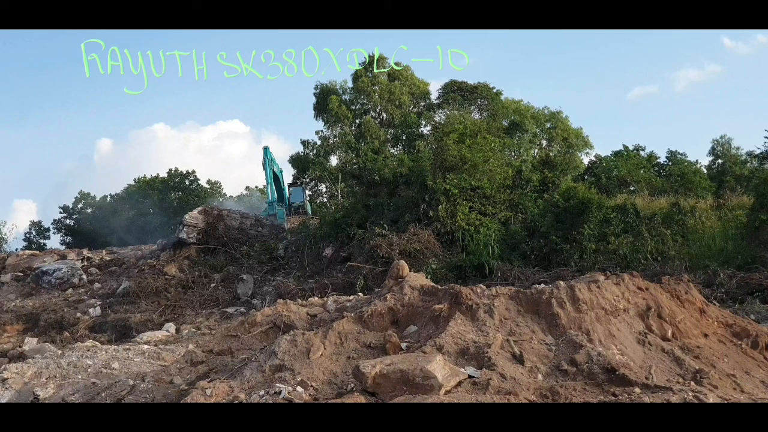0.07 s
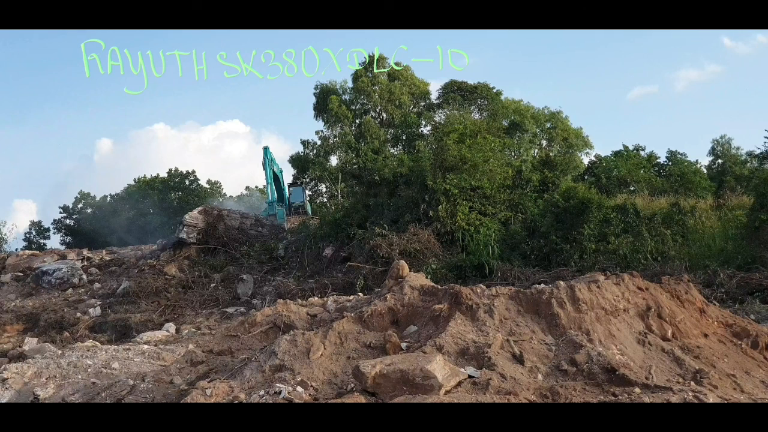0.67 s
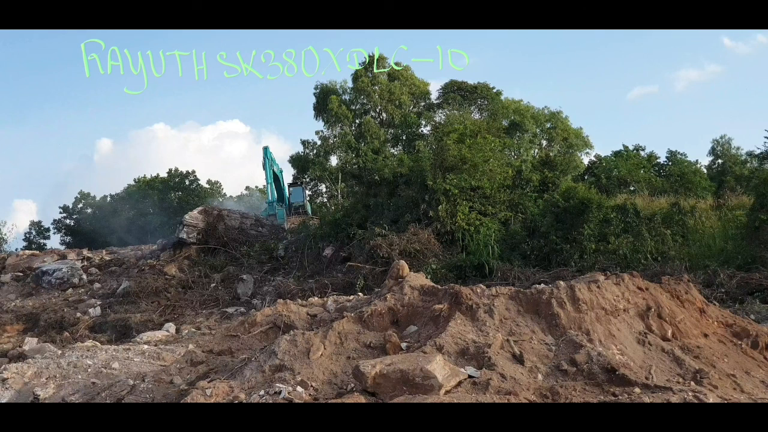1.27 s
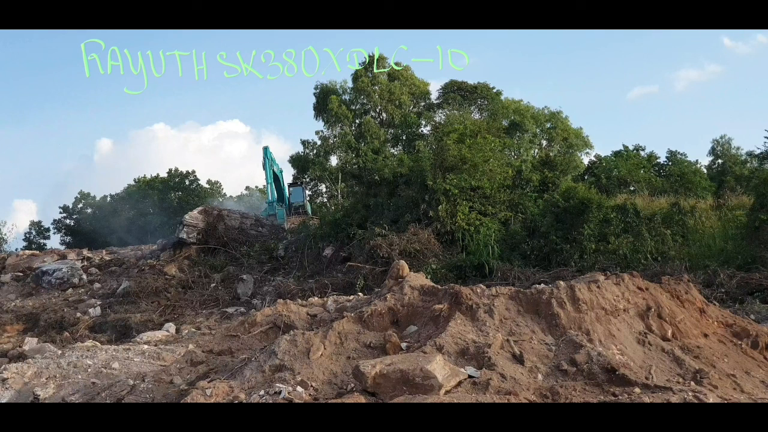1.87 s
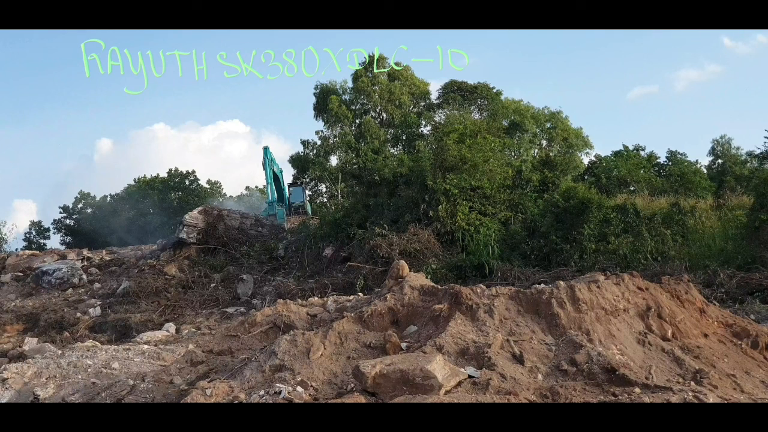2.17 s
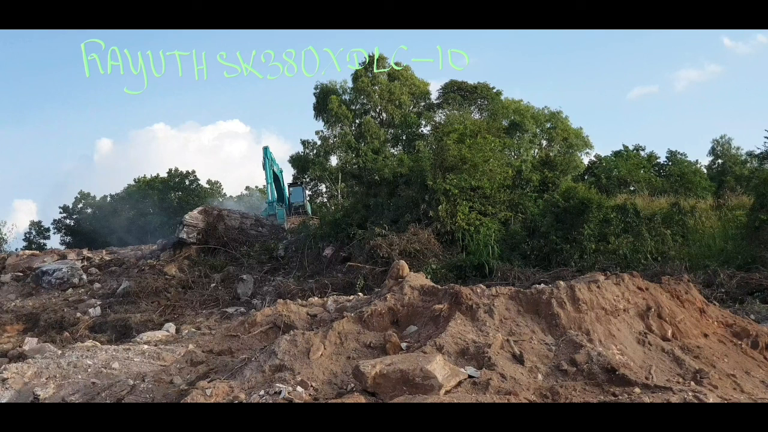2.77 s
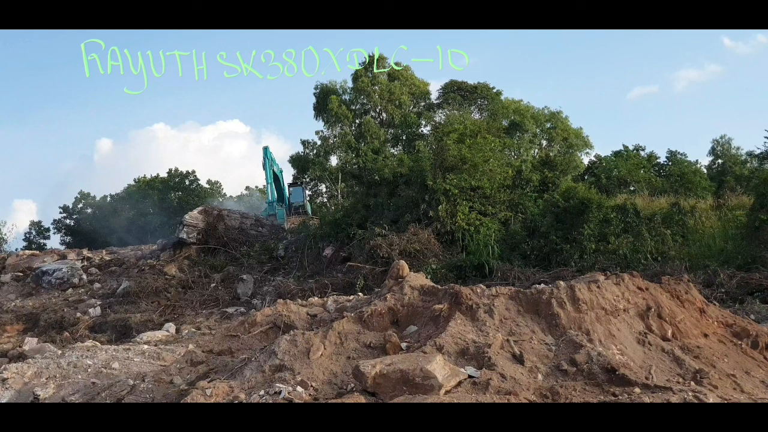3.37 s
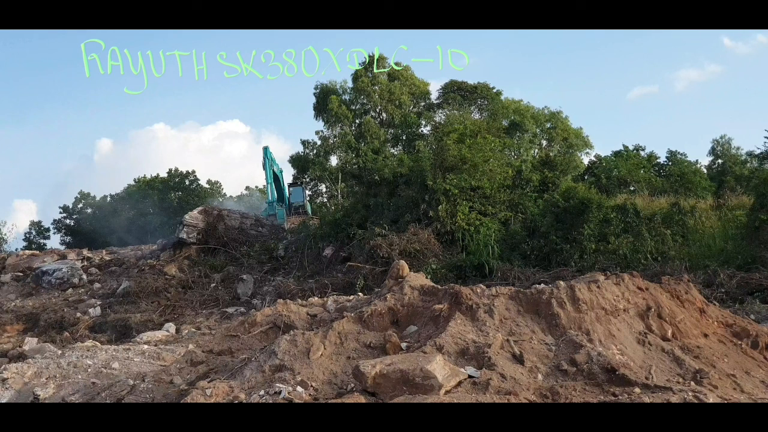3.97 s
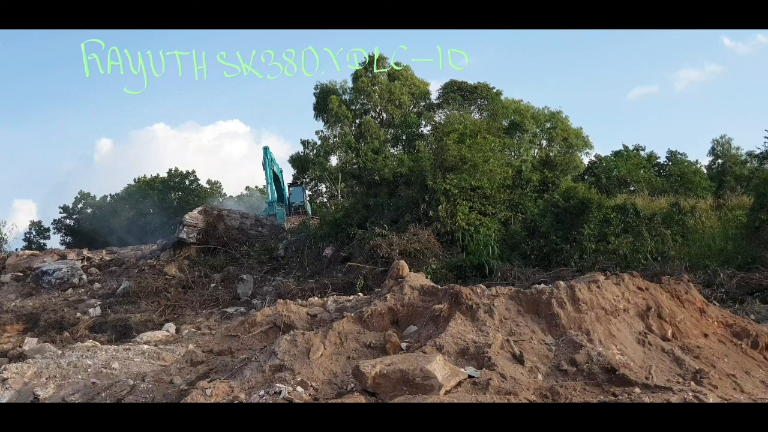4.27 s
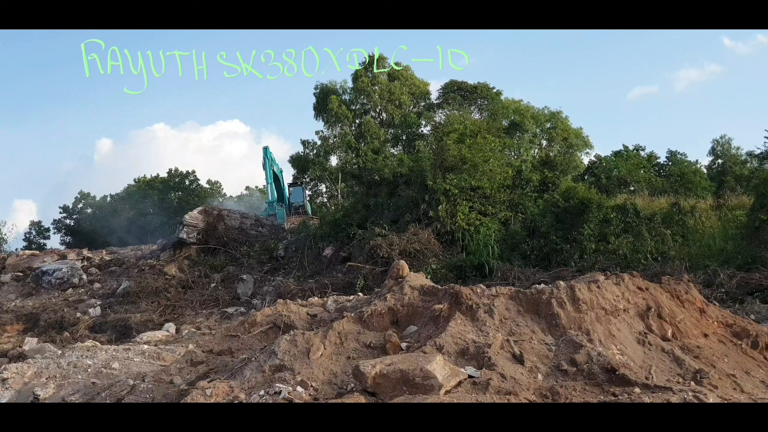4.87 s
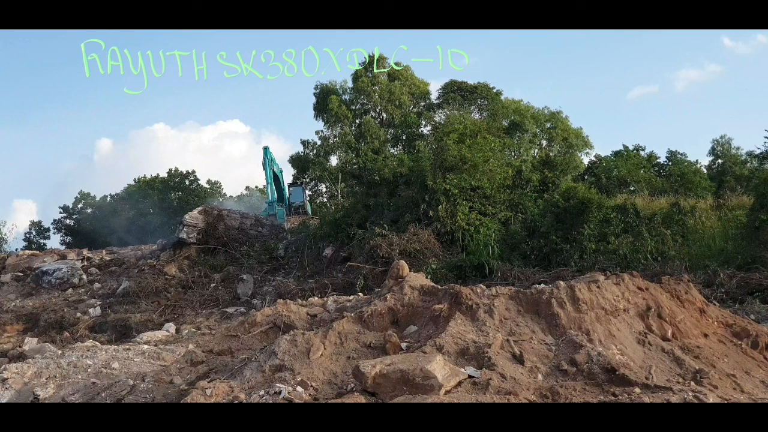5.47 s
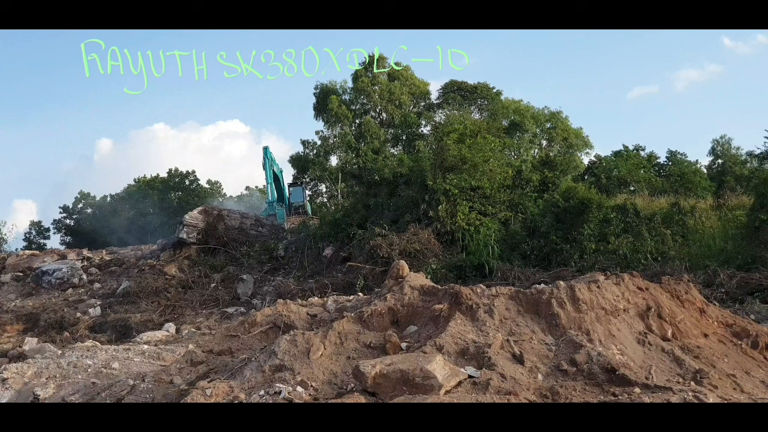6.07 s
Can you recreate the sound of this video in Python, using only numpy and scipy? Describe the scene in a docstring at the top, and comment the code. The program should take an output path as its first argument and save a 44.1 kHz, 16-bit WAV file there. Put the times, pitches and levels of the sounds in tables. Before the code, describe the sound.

Outdoors at a dirt site, a distant excavator gives a constant low diesel rumble and hum, with faint ticks and pings of loose metal over a soft leafy hiss. Two small crunches of soil and stone come near the microphone first. Later, rocks knock and ring briefly on thick steel, twice, dulled by distance, as the engine runs on unchanged.

```python
"""A distant excavator chugs at idle on rocky earthworks, a second diesel and a cooling fan droning beside it.
Periodic firing gives the exhaust its harmonics and pings the block, while loose metal rattles.
Grit crunches faintly close by, over a soft hiss of trees and open air that swells with one gust.
Twice, tumbling rocks excite the modes of a heavy steel plate, dulled by distance and scattered by mounds."""
import sys
import numpy as np
from scipy import signal
from scipy.fft import rfft, irfft
from scipy.io import wavfile
from scipy.ndimage import uniform_filter1d

SR = 44100
rng = np.random.default_rng(int(sys.argv[2]) if len(sys.argv) > 2 else 0)


def generate_wav(sig):
    """Save sig (samples, or channels by samples) to the path in sys.argv[1] as 16-bit PCM at SR."""
    pcm = np.round(np.clip(np.atleast_2d(sig).T, -1, 1) * 32767).astype(np.int16)
    wavfile.write(sys.argv[1], SR, pcm)


N = 269451
TIME = np.arange(N) / SR


def amp(db):
    """Amplitude grows tenfold with every 20 dB."""
    return 10 ** (np.asarray(db) / 20)


def unit(x):
    """Normalisation to an rms of 1."""
    return x / np.sqrt(np.mean(x ** 2) + 1e-20)


def damping(t, t60):
    """A free vibration decays exponentially, by 60 dB in t60 seconds."""
    return np.exp(-np.log(1000) * t / t60)


def curve_at(points, hz):
    """Interpolation along a logarithmic frequency axis."""
    f, value = np.transpose(points)
    return np.interp(np.log(hz + 1), np.log(f + 1), value)


def add(mix, start_s, sound):
    """Superposition: a stereo sound joins the mix at its start time."""
    part = mix[:, max(round(start_s * SR), 0):][:, :sound.shape[1]]
    part += sound[:, :part.shape[1]]


def drift(top_hz):
    """Low-passed noise gives a slow random fluctuation of rms 1."""
    hz = np.fft.rfftfreq(N, 1 / SR)
    low_pass = np.exp(-(hz / top_hz) ** 2) * (hz > 0)
    return unit(irfft(rfft(rng.standard_normal(N)) * low_pass, N))


def noise(spectrum, size=N, tilt_db=0):
    """Shaped stereo noise, coherent between the sides only at long wavelengths."""
    # Each row: frequency in Hz, left-right correlation.
    coherence = [(60, .99), (160, .96), (260, .87), (430, .64), (710, .37), (1200, .26), (2000, .2),
                 (3100, 0), (14000, 0)]
    hz = np.fft.rfftfreq(size, 1 / SR)
    left, independent = rfft(rng.standard_normal((2, size)))
    shared = np.clip(curve_at(coherence, hz), -1, 1)
    pair = np.array([left, shared * left + np.sqrt(1 - shared ** 2) * independent])
    octaves = np.log2(np.maximum(hz, 100) / 1000)
    return irfft(pair * amp(curve_at(spectrum, hz) + tilt_db * octaves), size) * np.sqrt(SR / 2)


def mounds(x, t60, echoes_per_s=1500):
    """Scattering: uneven ground returns sparse echoes, different on each side."""
    t = np.arange(SR // 2) / SR
    taps = rng.standard_normal((2, len(t))) * (rng.random((2, len(t))) < echoes_per_s / SR)
    taps *= damping(t, t60)
    taps /= np.linalg.norm(taps, axis=1, keepdims=True)
    return signal.fftconvolve(x, taps, axes=1)[:, :N]


def gust_db(lull_db, swell_db, fade_s, start_s=1.36, rise_s=.28):
    """One gust raises a level linearly, then lets it relax exponentially toward the lull."""
    age = TIME - start_s
    fade = np.exp(-np.maximum(age - rise_s, 0) / fade_s)
    return lull_db + swell_db * np.clip(age / rise_s, 0, 1) * fade


def air():
    """Leaves in a breeze make broadband noise, which flickers and swells with the gust."""
    # Each row: frequency in Hz, relative spectral density in dB.
    hiss = [(100, -91), (1500, -81.5), (3200, -86), (4200, -84.5), (4900, -87.5), (6200, -87.5),
            (7000, -90), (7900, -89), (9200, -94.5), (10700, -90.5), (12200, -92), (14300, -98)]
    flicker_db = .3 * drift(30) + .2 * drift(6)
    return noise(hiss) * amp(gust_db(lull_db=-1.18, swell_db=2.0, fade_s=4.1) + flicker_db)


def grit(cracks_per_s=900):
    """Loose soil crunches in short noise bursts, amplitude-modulated by tiny random cracks."""
    # Each row: start in seconds, level in dB, decay time in seconds, tilt in dB per octave.
    crunches = [(.068, -41, .008, 2.5), (.162, -36, .025, -1.5), (.536, -32, .005, -.5),
                (.543, -23.5, .005, -3), (.553, -28.5, .004, -1.5), (.559, -32, .003, 2.5),
                (.564, -32, .016, -2.5), (.588, -41, .012, 3), (.602, -37.5, .01, 3.5),
                (1.673, -21, .0045, .5), (1.709, -38, .005, 4.5), (1.781, -29, .007, -.5),
                (1.815, -38, .012, 2.5), (1.850, -38, .012, 2), (1.866, -34, .012, 0)]
    # Each row: frequency in Hz, relative level in dB.
    grain_spectrum = [(120, -15), (250, 3), (600, -1), (1100, -9), (1650, -6), (2500, -14), (4200, -16),
                      (8000, -26), (14000, -37)]
    out, t = np.zeros((2, N)), np.arange(SR // 5) / SR
    for start_s, db, decay_s, tilt_db in crunches:
        impulses = rng.random(len(t)) < cracks_per_s / SR
        cracks = signal.lfilter([1], [1, -np.exp(-1 / (.00086 * SR))], impulses)
        burst = noise(grain_spectrum, size=len(t), tilt_db=tilt_db) * (1 + cracks)
        envelope = (1 - np.exp(-t / .0015)) * np.exp(-t / decay_s)
        add(out, start_s, amp(db) * unit(burst + .11 * burst[::-1]) * envelope)
    return out


def chips():
    """Small stones collide nearby, each click a single heavily damped mode."""
    # Each row: start in seconds, frequency in Hz, level in dB, t60 in seconds.
    clicks = [(.5595, 1560, -31, .016), (.582, 1620, -37.5, .08), (1.674, 2350, -35, .015),
              (1.7815, 1530, -31, .022), (1.836, 1400, -37, .025), (1.869, 1380, -37, .025)]
    out, t = np.zeros((2, N)), np.arange(SR // 10) / SR
    for start_s, hz, db, t60 in clicks:
        ring = np.sin(2 * np.pi * (hz * t + .2 * rng.random((2, 1))))
        add(out, start_s, amp(db) * ring * damping(t, t60))
    return out


def shaft(hz, wander_s, start_s):
    """Phase, in cycles, of a governed machine that runs slightly early or late."""
    return hz * (TIME - start_s + wander_s * drift(.44))


def drone(cycles, orders, waver, dispersion=0):
    """Periodic motion radiates harmonics; each wavers, and dispersion delays the higher ones."""
    out = np.zeros(N)
    knots = np.linspace(0, TIME[-1], num=20)
    for order, db in orders:
        sway = np.interp(TIME, knots, rng.standard_normal(len(knots)))
        phase = 2 * np.pi * order * (cycles - dispersion * order / 2)
        out += amp(db) * (1 + waver * sway) * np.cos(phase)
    return np.sqrt(2) * out


def diesel_and_fan():
    """A second diesel and a cooling fan beat against exhaust harmonics of nearby frequency."""
    # Each row: multiple of the firing rate, relative level in dB.
    diesel_orders = [(1, -49.2), (2, -35.3), (3, -42.9)]
    # Each row: multiple of the blade rate, relative level in dB.
    fan_orders = [(1, -33.2), (3, -46.4)]
    diesel = drone(shaft(hz=33.94, wander_s=.0006, start_s=rng.random()), diesel_orders, waver=.15)
    fan = drone(shaft(hz=52.51, wander_s=.00025, start_s=rng.random()), fan_orders, waver=.2)
    return diesel + fan


def rattle(taps_per_s=14):
    """Random impacts of uneven force ring loose metal parts, and the ground scatters the sound."""
    # Each row: frequency in Hz, relative level of the softest tap in dB, t60 in seconds.
    loose_parts = [(1000, -59, .06), (1290, -54, .06), (1420, -56, .05), (1560, -59, .05), (2200, -57, .07),
                   (2380, -62, .05)]
    out, t = np.zeros(N), np.arange(SR // 8) / SR
    for hz, db, t60 in loose_parts:
        taps = rng.random(N) < taps_per_s / SR
        force = amp(3.5 * np.minimum(rng.exponential(1, N), 3))
        ring = amp(db) * damping(t, t60) * np.sin(2 * np.pi * hz * t)
        out += signal.oaconvolve(taps * force, ring)[:N]
    return out + mounds(out[None], t60=.19)


def metallic_pings(t60=.1, pair_ratio=1.06):
    """Faint, brief pings stand out slightly from the engine's clatter, each two close modes beating."""
    # Each row: start in seconds, lower mode in Hz, relative level in dB.
    pings = [(.194, 1200, -41), (.676, 1300, -40), (1.465, 2400, -41), (1.867, 1300, -39),
             (2.142, 1400, -40), (2.639, 2200, -40), (2.751, 1350, -37), (3.283, 2400, -41),
             (3.424, 1310, -38), (3.482, 2250, -40), (3.709, 2250, -40), (4.389, 950, -41),
             (4.621, 2100, -40), (5.041, 1380, -39), (5.101, 1290, -37), (5.592, 1350, -40)]
    out, t = np.zeros((2, N)), np.arange(SR // 6) / SR
    envelope = (1 - np.exp(-t / .001)) * damping(t, t60)
    for start_s, hz, db in pings:
        pair_hz = hz * np.array([pair_ratio, 1])[:, None, None]
        upper, lower = np.sin(2 * np.pi * (pair_hz * t + rng.random((2, 2, 1))))
        add(out, start_s, amp(db) * (lower + upper / 2) * envelope)
    return out


def diesel_knock(cycles, cylinder_db=7.5, spread_db=1.7, decay_s=.005):
    """Each firing shock-excites the block's resonance, some cylinders harder than others."""
    # Each row: frequency in Hz, relative level in dB.
    block_response = [(300, -60), (800, -32), (1150, 0), (1300, 1), (1420, -2), (1600, -31), (2200, -32),
                      (5000, -70)]
    out, t = np.zeros((2, N)), np.arange(2048) / SR
    envelope = (1 - np.exp(-t / .0005)) * np.exp(-t / decay_s)
    firings = np.flatnonzero(np.diff(np.floor(6 * cycles)) > 0)
    for at in firings:
        db = -42.5 + cylinder_db * np.cos(2 * np.pi * cycles[at])
        db += spread_db * np.clip(rng.standard_normal(), -2, 2)
        add(out, at / SR, amp(db) * unit(noise(block_response, size=len(t))) * envelope)
    return out


def exhaust(cycles, cycle_hz, thump_hz=90, thump_s=.008):
    """Six even firings a cycle give every sixth harmonic; unequal cylinders supply those between."""
    # Each row: multiple of the four-stroke cycle rate, relative level in dB.
    orders = [(9, -44.3), (10, -44.5), (11, -51.7), (12, -31.4), (13, -50.8), (14, -42.4), (15, -35.2),
              (16, -40.9), (17, -39.9), (18, -28.6), (19, -41.7), (20, -32.0), (21, -30.1), (22, -37.9),
              (23, -33.6), (24, -39.6), (25, -45.3), (26, -51.8), (35, -51.5), (41, -48.8), (46, -53.9),
              (50, -54.3)]
    firing_orders = [row for row in orders if row[0] % 6 == 0]
    uneven_orders = [row for row in orders if row[0] % 6]
    hum = drone(cycles - .021, firing_orders, waver=.07, dispersion=.002)
    chug = drone(cycles - .354, uneven_orders, waver=.11, dispersion=.18)  # smeared by the pipe
    age = ((cycles - .061 + .5) % 1 - .5) / cycle_hz  # seconds from the hardest cylinder's firing
    thump = amp(-24) * np.sin(2 * np.pi * thump_hz * age) * np.exp(-(age / thump_s) ** 2)
    return thump - hum - chug


def excavator(cycle_hz=5.4625):
    """The four-stroke cycle times the exhaust and knock, and modulates the rumble and clatter."""
    # Uneven combustion and gas flow. Each row: frequency in Hz, relative spectral density in dB.
    rumble = [(10, -80), (25, -69), (40, -58), (53, -52), (70, -53), (80, -46), (86, -52), (100, -48),
              (125, -55), (150, -59), (195, -63), (240, -62.5), (330, -67), (520, -68.5), (900, -73.5),
              (2000, -81), (6000, -120)]
    # Mechanical noise of the block. Each row: frequency in Hz, relative spectral density in dB.
    clatter = [(200, -104), (600, -80), (950, -74.5), (1090, -80), (1300, -73.5), (1520, -78),
               (1720, -80.5), (2030, -76.5), (2200, -72.5), (2310, -76.5), (2450, -81), (2800, -86),
               (5000, -100), (14000, -120)]
    cycles = shaft(cycle_hz, wander_s=.00026, start_s=.1022)
    tones = exhaust(cycles, cycle_hz)
    firing = np.cos(2 * np.pi * 6 * cycles)
    crank = np.cos(2 * np.pi * 2 * cycles)
    shake = unit(amp(firing + .7 * crank + .6 * drift(14)))
    chuff = unit(amp(.5 * np.cos(2 * np.pi * cycles) + .5 * drift(35)))
    return tones + chuff * noise(rumble) + shake * noise(clatter) + diesel_knock(cycles)


def flare_and_squeaks():
    """Narrow-band noise: a brief flare of the machine's rattle, then two squeaks as the rocks tumble."""
    # Each row: start in seconds, centre in Hz, bandwidth in Hz, level in dB, length in seconds.
    bursts = [(3.596, 2270, 150, -43, 0.047), (3.835, 1330, 250, -36.5, 0.03),
              (3.975, 2920, 130, -47, 0.07)]
    out, t = np.zeros((2, N)), np.arange(SR // 4) / SR
    for start_s, hz, width, db, length_s in bursts:
        band = [(hz / (1 + 2 * width / hz), -40), (hz - width / 2, -6), (hz, 0),
                (hz + width / 2, -6), (hz + 2 * width, -40)]
        ring = unit(noise(band, size=len(t)))
        envelope = np.sin(np.pi * np.minimum(t / length_s, 1))
        add(out, start_s, amp(db) * ring * envelope)
    return out


def rock_on_plate(db, spot_hz, spot_db, crush_db, tilt_db, spot_width_hz=66, onset_s=.0044):
    """The point of impact selects which plate modes ring most; the stone crumbles in a grainy burst."""
    # Each row: frequency in Hz, relative level in dB, t60 in seconds.
    plate_modes = [(226, -11, .3), (291, -6, .3), (385, -7, .2), (412, -5, .2), (481, -5.5, .26),
                   (564, -5, .32), (634, -4, .19), (685, -5, .14), (775, -12, .2), (838, -7.5, .15),
                   (893, -5.5, .14), (945, -4.5, .16), (1130, -14, .15), (1315, -12, .18), (1400, -15, .14),
                   (2040, -18, .15)]
    # Each row: frequency in Hz, relative level in dB.
    crush_spectrum = [(120, -7), (260, 15), (340, 0), (420, 7.5), (660, 13.5), (760, -9), (930, 8),
                      (1100, -5), (1350, 0.5), (1750, -4.5), (2150, -7.5), (2900, -15), (4500, -25),
                      (10000, -36.5)]
    t = np.arange(SR // 2) / SR
    hz, mode_db, t60 = np.transpose(plate_modes)[:, :, None]
    favoured = np.exp(-((hz - spot_hz) / spot_width_hz) ** 2)
    share = amp(mode_db + spot_db * favoured + rng.standard_normal(hz.shape))
    detuned_hz = hz * (1 + .014 * rng.standard_normal(hz.shape))
    phase = 2 * np.pi * (detuned_hz * t + rng.random(hz.shape))
    ring = (share * damping(t, t60) * np.sin(phase)).sum(0) / np.linalg.norm(share)
    grain_db = 1.5 * unit(uniform_filter1d(rng.standard_normal(len(t)), size=160))
    crush_envelope = unit(amp(grain_db)) * np.exp(-t / .032)
    crush = unit(noise(crush_spectrum, size=len(t), tilt_db=tilt_db)) * crush_envelope
    blend = (ring + amp(crush_db) * crush) * np.sqrt(2 / (1 + amp(crush_db) ** 2))
    return amp(db) * (1 - np.exp(-t / onset_s)) * blend


def rocks():
    """Two tumbles, each a run of impacts whose ringing overlaps on the steel."""
    # Each row: start in seconds, level in dB, frequency the struck spot favours in Hz, its boost in dB,
    # crush relative to ring in dB, tilt of the crush in dB per octave.
    impacts = [(3.871, -25, 291, 14, -9, 2.5), (3.896, -26, 291, 11, -7, 1), (3.930, -25, 392, 13, -1, 0),
               (3.955, -22.5, 500, 9, -1, -0.5), (3.995, -23, 280, 20, 2.5, -1.5),
               (4.024, -23, 440, 6.5, -10, 2.5), (4.040, -27, 940, 9, -1, 2),
               (4.044, -21, 626, 10, -9, -2.5), (4.078, -25, 503, 7, 0, -7),
               (4.900, -26.5, 420, 5, -1.5, 2.5), (4.921, -23.5, 685, 6, -4.5, 2.5),
               (4.959, -25, 400, 6, -2, 0), (4.975, -24.5, 634, 5, -5, 0), (5.018, -34, 564, 10, -4, -3)]
    out = np.zeros((2, N))
    for start_s, *impact in impacts:
        add(out, start_s, rock_on_plate(*impact))
    return out


def scene():
    """The sources superpose in open air; the gust carries the machines a little better."""
    carry = amp(gust_db(lull_db=-1.32, swell_db=1.22, fade_s=98))
    machines = carry * (excavator() + rattle() + metallic_pings() + diesel_and_fan())
    transients = rocks() + flare_and_squeaks()
    echoes = amp(-10) * mounds(transients, t60=.2)
    return machines + air() + transients + echoes + grit() + chips()


def record(dry, cutoff_hz=14450):
    """Linear filtering colours the two sides differently and limits the bandwidth."""
    # Each row: frequency in Hz, left minus right level in dB.
    balance = [(55, .9), (120, 2.0), (300, 1.1), (650, 1.5), (1300, -.4), (2300, -2.7), (4200, -1),
               (7600, 1.5), (13000, 4.5)]
    lean_db = curve_at(balance, np.fft.rfftfreq(N, 1 / SR)) / 2
    coloured = irfft(rfft(dry) * amp([lean_db, -lean_db]), N)
    low_pass = signal.firwin(511, cutoff_hz, window=("kaiser", 9), fs=SR)
    return signal.oaconvolve(coloured, low_pass[None], "same", axes=1)


dry = scene()
out = record(dry)
generate_wav(out)
```